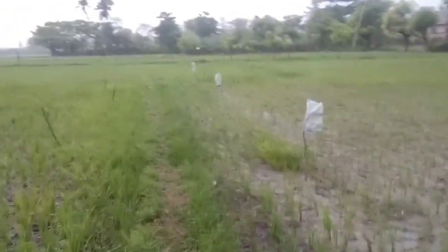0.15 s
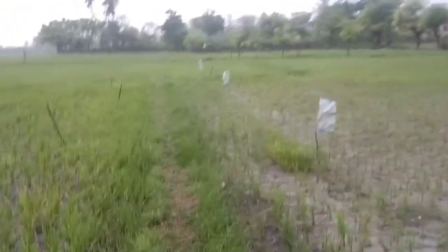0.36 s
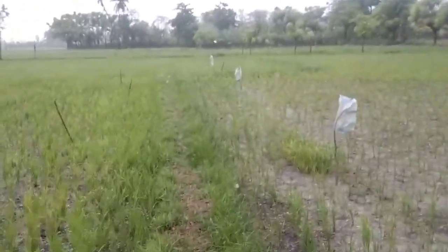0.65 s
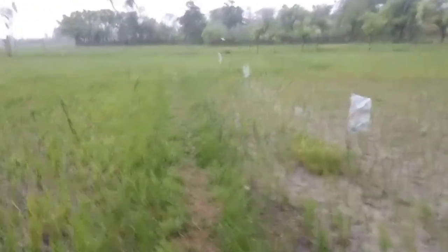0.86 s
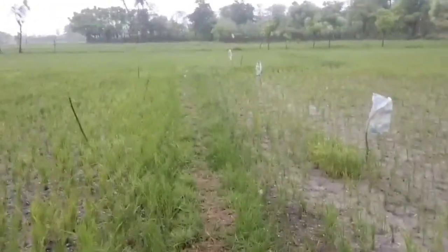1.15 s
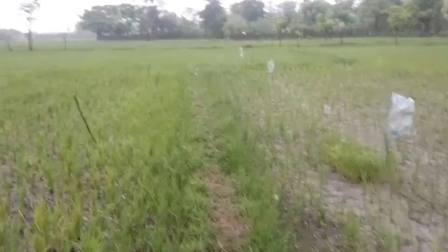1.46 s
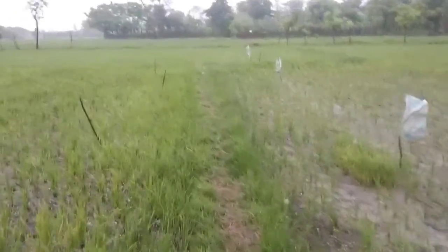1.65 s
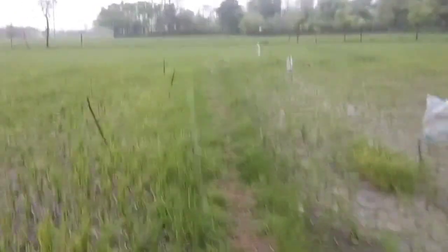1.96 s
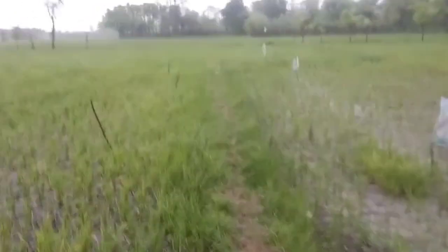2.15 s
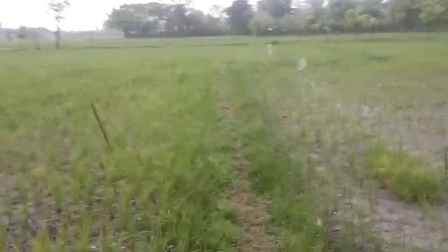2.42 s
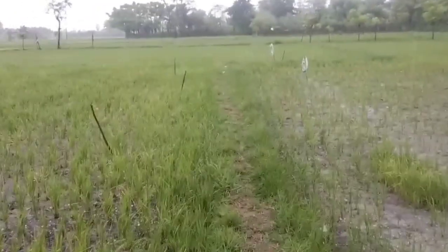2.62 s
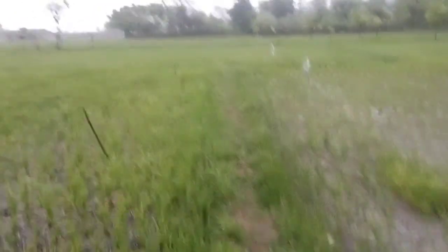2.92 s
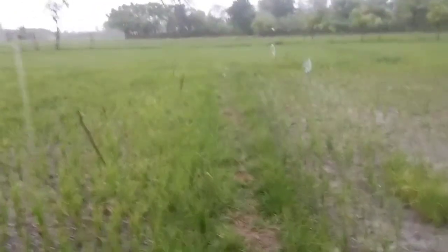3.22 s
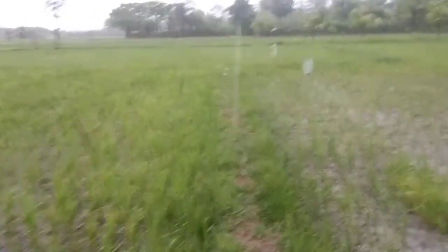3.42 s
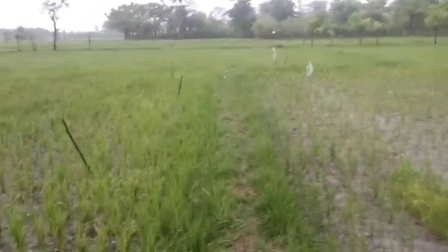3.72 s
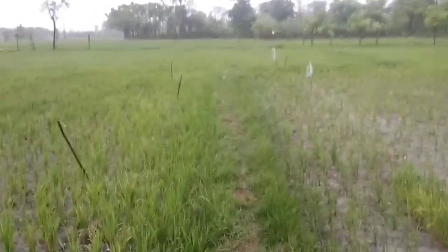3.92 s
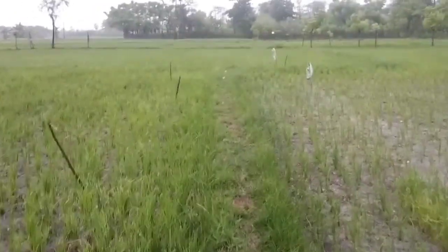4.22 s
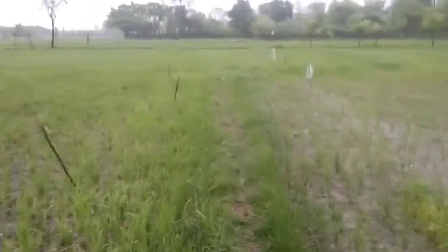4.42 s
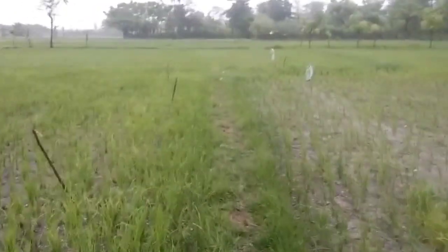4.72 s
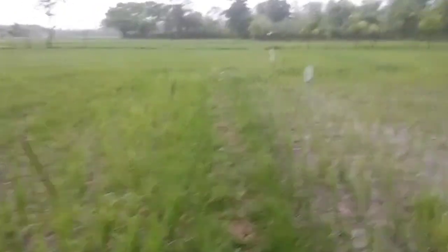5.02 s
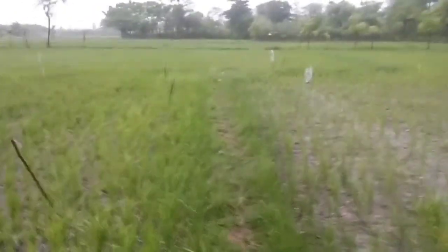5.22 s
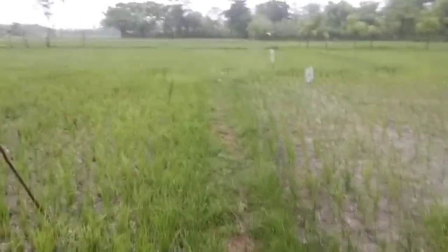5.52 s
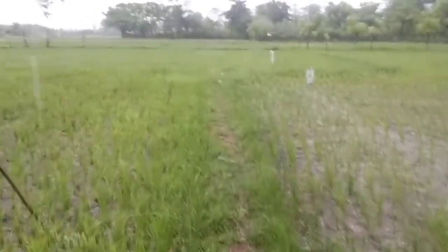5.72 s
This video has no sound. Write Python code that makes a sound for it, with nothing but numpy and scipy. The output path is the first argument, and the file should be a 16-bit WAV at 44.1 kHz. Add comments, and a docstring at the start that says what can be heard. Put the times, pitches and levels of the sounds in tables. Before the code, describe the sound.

Heavy rain drums on taut cloth close by while wind thumps the microphone; after a second the rain sinks to gated, broken bursts of drops.

```python
"""Heavy rain drums on an umbrella just above a hand-held phone in an open field; gusts buffet its microphone.
Just after one second the rain sinks; gusts and the strongest parts of drops still break through briefly.
Drops are filtered impulses and grit with short rings, small rain is random slaps over noise, wind is
lumpy low noise with thumps. A noise suppressor gates each narrow band by its margin over a usual level."""
import sys
import numpy as np
from scipy import signal
from scipy.io import wavfile
from scipy.ndimage import uniform_filter1d

SR = 44100
rng = np.random.default_rng(int(sys.argv[2]) if len(sys.argv) > 2 else 0)


def output_pcm(signal):
    """Save a mono or channel-first signal as 16-bit PCM at the path in sys.argv[1].

    Samples are clipped to [-1, 1] before scaling.
    """
    pcm = np.clip(np.atleast_2d(signal).T, -1, 1) * 32767
    wavfile.write(sys.argv[1], SR, np.round(pcm).astype(np.int16))


def field_ratio(decibels):
    """Amplitude ratio for a level in dB (20 dB per decade); scalars and array-likes work."""
    return 10 ** (np.asarray(decibels, dtype=float) / 20)


N = 258867


def evened(x):
    """Scales to rms 1."""
    return x / np.sqrt(np.mean(x ** 2) + 1e-20)


def read(points, hz):
    """Reads a spectrum on a log-frequency axis."""
    f, value = np.transpose(points)
    return np.interp(np.log(hz + 1), np.log(f + 1), value)


def add(mix, s, sound):
    """Mixes a sound in at time s."""
    part = mix[round(s * SR):][:len(sound)]
    part += sound[:len(part)]


def colour(x, points):
    """Causal minimum-phase filter of energy 1 shaped by (frequency [Hz], relative gain [dB])."""
    hz = abs(np.fft.fftfreq(8192, 1 / SR))
    log_gain = np.log(field_ratio(np.maximum(read(points, hz), -100)))
    taps = np.fft.ifft(np.exp(np.conj(signal.hilbert(log_gain)))).real[:4096]
    return signal.oaconvolve(x, taps / np.linalg.norm(taps))[:N]


def ring(hz, rise_s, fall_s):
    """A sine that swells and dies exponentially, envelope peak 1."""
    t = np.arange(3000) / SR
    envelope = (1 - np.exp(-t / rise_s)) * np.exp(-t / fall_s)
    return np.sin(2 * np.pi * hz * t) * envelope / envelope.max()


def slap(grit, splash_db=-18, splash_s=0.0021, thin_hz=120, soft_hz=9000):
    """A drop on cloth: a sharp push and a short noise splash, with little deep bass or top treble."""
    t = np.arange(len(grit)) / SR
    push = t == 0
    splash = field_ratio(splash_db) * grit * np.exp(-t / splash_s)
    return signal.lfilter(*signal.butter(1, (thin_hz, soft_hz), "band", fs=SR), push + splash)


def panel(hz):
    """One panel of cloth ringing briefly; low rings last longer."""
    time_s = .0013 + 0.3 / hz  # fixed part plus 0.3 cycles
    return ring(hz, time_s, time_s)


def large_drops():
    """Each drop slaps the cloth, rings it at two pitches and throws off nine bright droplets."""
    # (time [s], slap level [dB], main ring [Hz], its level [dB], second ring [Hz], its level [dB])
    drops = [(.0707, 32.5, 1100, 4.5, 2790, -5), (.0936, 33, 1430, 10, 2600, 0),
             (.1039, 29, 1120, 7, 2620, 2), (.1163, 30, 830, -1, 2460, -5),
             (.1253, 37.5, 840, 4.5, 4870, 3), (.1626, 35, 945, -6, 2600, -9),
             (.1819, 40, 1450, 14, 2400, 13), (.2053, 33, 1420, 8, 3330, 2),
             (.2554, 39, 1220, 3.5, 2120, 5), (.3186, 36.5, 1350, 2, 2020, 7),
             (.3294, 24, 1435, 7, 2550, 5), (.4368, 32.5, 810, -8, 3730, 2),
             (.5037, 35.5, 1340, -1, 2030, 10), (.5399, 37, 950, -3, 1990, 8),
             (.558, 12, 1300, -2.5, 2650, 2), (.5771, 16, 1300, -1, 2760, 1),
             (.6226, 28.5, 1436, 4, 3250, -3), (.6615, 31, 1070, -12, 2210, 4),
             (.6834, 33, 724, 5, 2070, 1), (.7014, 35, 14000, 19, 1340, 2),
             (.7076, 36.5, 1420, -7, 2160, 1), (.7173, 38.5, 1330, 4, 3000, -4),
             (.7457, 35, 610, -7, 2800, 2), (.7543, 35.5, 1300, 5.5, 2860, 6),
             (.781, 29.5, 1400, -12, 3260, 0), (.8296, 30.5, 1310, -1, 2110, 1),
             (.87, 33, 543, -1, 2850, 4), (.8836, 29.5, 673, 4.5, 2230, -2), (1.0109, 39, 1390, 7, 6350, 6),
             (1.0494, 33, 950, -8, 2580, 7), (1.0681, 32.5, 920, -3, 2820, 5),
             (1.1099, 36.5, 1064, 10, 3320, 4), (1.188, 32.5, 654, 5.5, 1230, -3),
             (1.239, 19, 1254, -0.5, 3570, 5), (1.275, 25, 2400, 5, 1150, -2),
             (1.288, 34, 6110, -2, 2265, 3.5), (1.304, 31.5, 1210, 5, 1970, 5),
             (1.352, 34.5, 1250, -8, 5830, 4), (1.458, 33.5, 1385, -3.5, 460, -6.5),
             (1.5035, 34.5, 1210, 4.5, 443, 2), (1.563, 36.5, 885, 3, 6550, 2.5),
             (1.609, 18, 2640, 5, 600, 2), (1.632, 28.5, 1402, 5, 3580, 7.5), (1.69, 18, 2560, 8, 1380, 2),
             (1.724, 26, 463, -5.5, 2423, 0), (1.76, 25, 1296, 3, 2020, 4.5),
             (1.835, 35.5, 508, 1, 967, 3.5), (1.8847, 34, 824, 4, 1240, -10),
             (1.969, 34.5, 1380, -0.5, 2770, -3), (2.157, 32.5, 1320, 2, 1800, -11),
             (2.208, 18, 6730, 7, 12800, 6), (2.227, 37, 359, 6, 2070, -1.5), (2.272, 21, 3750, 6, 1386, 3),
             (2.327, 31, 689, 4.5, 3480, 9), (2.347, 38, 680, 8, 2470, 5), (2.384, 41, 1626, 10, 950, 2.5),
             (2.471, 28.5, 3385, 6.5, 13400, 6), (2.549, 37, 715, 8.5, 1420, 2),
             (2.562, 37, 496, 4, 2670, 10.5), (2.6375, 39, 837, 7, 1410, 9),
             (2.687, 32.5, 3570, -13, 1435, 5.5), (2.8175, 35, 1220, 2.5, 3500, -4),
             (2.831, 35, 510, 4, 940, 1), (2.888, 34.5, 4600, 4, 2607, -4.5),
             (2.892, 35.5, 7070, 12.5, 1140, 6.5), (3.073, 30.5, 890, 2, 3750, 3),
             (3.154, 33.5, 1347, 0.5, 472, 1.5), (3.17, 26.5, 2880, 5, 1400, -1.5),
             (3.182, 40, 1460, -5, 4540, 1), (3.215, 36, 7100, 6, 2960, 3),
             (3.259, 34, 1400, 5, 2300, -1.5), (3.311, 39.5, 392, 8, 1978, -8),
             (3.613, 31.5, 11470, 6, 7260, 3.5), (3.661, 36.5, 570, -3, 9300, 4),
             (3.771, 35, 1555, 9.5, 6914, 5.5), (3.902, 29, 1040, 5, 393, -12),
             (3.917, 35.5, 467, 1, 1760, 6), (3.922, 40, 996, 3, 2570, 2), (3.992, 31, 242, 2, 1000, -11),
             (4.021, 27.5, 1340, 3.5, 13600, 4), (4.033, 22, 248, -3.5, 336, -10),
             (4.09, 34, 230, -1.5, 410, -22), (4.128, 33, 1159, 8.5, 7750, 4.5),
             (4.149, 36, 450, -2, 3360, 4), (4.194, 32.5, 3570, 8.5, 470, -0.5),
             (4.247, 23, 2200, 5, 910, -1), (4.327, 34.5, 2520, 4.5, 830, -4.5),
             (4.438, 26, 340, 2, 7230, 6), (4.443, 31, 6956, 9.5, 6050, 4),
             (4.459, 16, 343, 3.5, 250, -4.5), (4.478, 35, 344, 7.5, 2616, 6.5),
             (4.516, 28, 12500, 6.5, 300, -5.5), (4.652, 35.5, 530, 3, 1153, 9.5),
             (4.662, 30, 1950, 6, 2760, 7.5), (4.838, 23, 14100, 6.5, 15200, 4),
             (4.951, 37.5, 437, 2, 3450, 8), (4.955, 20, 147, -5.5, 5150, 6),
             (4.963, 27, 1400, 0, 830, 0.5), (5.037, 23, 443, 2, 150, -6.5),
             (5.291, 29, 2586, 5, 11280, 3.5), (5.369, 34, 3617, 4, 2310, 7.5),
             (5.447, 33.5, 3673, 2, 1300, -5), (5.468, 29.5, 11550, 12.5, 6200, 8.5),
             (5.4697, 34, 7100, 13.5, 10570, 10), (5.752, 29, 1330, 2.5, 904, 0),
             (5.85, 28, 1030, 5, 1530, -15)]
    spatter_db, spatter_hz, spatter_span_s = -40, (2200, 15210), 0.007  # level relative to the slap setting
    out = np.zeros(N)
    grits = rng.standard_normal((len(drops), 600))
    for (s, slap_db, main_hz, main_db, second_hz, second_db), grit in zip(drops, grits):
        add(out, s, field_ratio(slap_db) * slap(grit, splash_db=-33.5, thin_hz=180, soft_hz=7130))
        rings = field_ratio(main_db) * panel(main_hz) + field_ratio(second_db) * panel(second_hz)
        add(out, s - .0025, rings)  # the swell starts ahead of the slap
        for pitch, late in rng.random((9, 2)):
            droplet_hz = np.exp(np.interp(pitch, (0, 1), np.log(spatter_hz)))
            droplet = field_ratio(slap_db + spatter_db) * ring(droplet_hz, 0.00089, 0.0025)
            add(out, s + spatter_span_s * late, droplet)
    return out


def middling_drops():
    """Drops that slap the cloth without ringing it."""
    # (time [s], slap level [dB])
    slaps = [(0.1963, 21), (0.286, 35.5), (0.299, 27), (0.3073, 18), (0.334, 35), (0.348, 15), (0.3601, 24),
             (0.4652, 29), (0.487, 29), (.668, 37), (0.7264, 16), (0.7718, 33), (0.8003, 34), (0.925, 17),
             (0.9568, 30.5), (1.205, 23.5), (1.222, 25), (1.262, 29), (1.33, 28.5), (1.398, 26.5),
             (1.425, 27.5), (1.531, 23), (1.584, 21), (1.656, 27.5), (1.79, 25.5), (0.9652, 35),
             (0.9861, 27.5), (1.0205, 24), (1.0446, 28), (1.093, 6), (1.1177, 23), (1.15, 31.5),
             (1.3143, 30), (1.368, 32.5), (1.384, 27), (1.464, 27), (1.481, 26.5), (1.8552, 16), (1.87, 19),
             (1.919, 33), (1.949, 29), (1.994, 31.5), (2.033, 30.5), (2.193, 14), (2.365, 29),
             (2.376, 33.5), (2.4083, 30), (2.4146, 36), (2.4355, 28), (2.4642, 36), (2.5713, 37),
             (2.5942, 24), (2.6223, 21), (2.6424, 33.5), (2.657, 24), (2.667, 21), (2.719, 25),
             (2.6903, 33.5), (2.848, 25), (3.1998, 31.5), (3.2096, 34.5), (3.249, 30), (3.273, 35),
             (3.333, 24), (3.3454, 32.5), (3.387, 27), (3.425, 31), (3.4465, 30), (3.4854, 27),
             (3.5538, 31), (3.9474, 26), (3.964, 36), (4.084, 28), (4.288, 33.5), (4.376, 29.5),
             (4.674, 25), (4.6962, 24), (4.7267, 22), (4.796, 28), (4.838, 18), (4.985, 28), (5.497, 32),
             (5.535, 31.5), (5.607, 26), (5.692, 33)]
    out = np.zeros(N)
    for (s, slap_db), grit in zip(slaps, rng.standard_normal((len(slaps), 600))):
        add(out, s, field_ratio(slap_db) * slap(grit, splash_db=-24.0, soft_hz=5850))
    return out


def patter(drops_per_s=380, spread_db=4, wash_db=-3.5):
    """Small drops at random, drawn from ten slaps, over the noise wash of rain on the field."""
    hit = rng.random(N) < drops_per_s / SR
    size = field_ratio(spread_db * np.minimum(rng.exponential(1, N), 2.4)) * hit
    spot = rng.integers(0, 10, N)
    out = np.zeros(N)
    for k, grit in enumerate(rng.standard_normal((10, 600))):
        out += signal.oaconvolve(size * (spot == k), slap(grit))[:N]
    wash = field_ratio(wash_db) * rng.standard_normal(N)  # level relative to the drops
    return evened(evened(out) + wash)


def ticks(ticks_per_s=160, loudest_db=-6, spread_db=7, range_hz=(3000, 15350)):
    """Small drops that ring only the treble, at random moments and pitches."""
    out = np.zeros(N)
    for at, pitch, size in rng.random((int(ticks_per_s * N / SR), 3)):
        tick_hz = np.interp(pitch, (0, 1), range_hz)
        add(out, at * N / SR, field_ratio(loudest_db - spread_db * size) * ring(tick_hz, 0.0039, 0.0026))
    return out


def wind(lump_db=4, lump_s=0.011, thump_cycles=0.54):
    """Low turbulence on the microphone port: noise in lumps, plus hard thumps as Gaussian sine bursts."""
    # wind level: (time [s], level [dB])
    gusts = [(0, -36), (0.38, -49), (.42, -35.5), (1.101, -32.5), (1.14, -33), (1.2, -25.5), (1.3, -31),
             (1.4, -36.5), (1.55, -34.5), (1.62, -45), (1.75, -38.5), (1.9, -82), (2.07, -74), (2.11, -74),
             (2.5, -76), (2.551, -37.5), (2.6, -30.5), (2.691, -27.5), (2.75, -19.5), (2.809, -32),
             (2.95, -36.5), (2.99, -28), (3.1, -29.5), (3.2, -31), (3.302, -37.5), (3.5, -47.5), (3.7, -56),
             (4.1, -60), (4.4, -60), (4.55, -54), (4.75, -54), (4.95, -41.5), (5.08, -53), (5.24, -50),
             (5.28, -46), (5.331, -32), (5.382, -37), (5.5, -20.5), (5.64, -32.5), (5.8, -35),
             (5.87, -41.5)]
    # turbulence spectrum: (frequency [Hz], relative gain [dB])
    buffet = [(20, -88), (40, -45), (62, -11), (95, 3.5), (160, -4), (230, -9), (374, -11.5), (540, -19.5),
              (900, -60)]
    # single pressure thumps: (centre [s], envelope peak [dB], frequency [Hz])
    thumps = [(0.065, -19.5, 148), (0.409, -17, 127), (0.437, -14.5, 158), (0.481, -16, 115),
              (0.524, -17, 142), (0.603, -22, 137), (0.698, -18.5, 176), (0.735, -16, 190),
              (0.773, -18, 180), (0.7982, -14.5, 180), (0.83, -19, 148), (0.904, -15, 155),
              (1.021, -21, 154), (1.06, -27, 159), (1.135, -7.5, 155), (1.153, -22, 146), (1.208, -20, 178),
              (1.654, -22.5, 118), (2.114, -26.5, 82), (2.559, -20.5, 142), (2.58, -21.5, 127),
              (2.7115, -17, 176), (2.7331, -7.5, 254), (2.747, -10.5, 164), (2.7611, -10, 190),
              (2.79, -28, 159), (2.981, -19.5, 129), (2.996, -14.5, 156), (3.015, -16.5, 139),
              (3.034, -18, 134), (3.093, -15.5, 148), (3.125, -24.5, 120), (3.145, -22.5, 121),
              (3.173, -18.5, 190), (3.181, -16.5, 190), (3.206, -15, 203), (3.212, -20.5, 203),
              (5.284, -27.5, 137), (5.37, -16.5, 137), (5.3833, -14, 182), (5.406, -15.5, 165),
              (5.436, -22.5, 156), (5.453, -13, 166), (5.4837, -21, 163), (5.5, -9, 220),
              (5.5343, -11.5, 190), (5.559, -44, 154), (5.578, -18, 173), (5.595, -15, 150),
              (5.627, -16.5, 183), (5.7116, -16.5, 145), (5.803, -23.5, 133.6)]
    gust_s, gust_db = np.transpose(gusts)
    smooth = uniform_filter1d(rng.standard_normal(N), int(lump_s * SR))
    lumps = evened(uniform_filter1d(smooth, 300))
    out = evened(colour(field_ratio(lump_db * lumps) * rng.standard_normal(N), buffet))
    out = out * field_ratio(np.interp(np.arange(N) / SR, gust_s, gust_db))
    t = np.arange(-.03, .03, 1 / SR)
    for s, peak_db, hz in thumps:
        envelope = field_ratio(peak_db) * np.exp(-(hz * t / thump_cycles) ** 2)
        phase = rng.uniform(0, 2 * np.pi)
        add(out, s + t[0], envelope * np.sin(2 * np.pi * hz * t + phase))
    return out


def scene():
    """Large and middling drops over small rain that swells with the shower, all coloured by cloth; wind."""
    # how hard the small rain falls: (time [s], level [dB])
    shower = [(0, 3), (.05, 2.5), (.15, 1.5), (.23, 1), (.3, 2.5), (.42, 2), (.52, 5), (.62, 3), (.72, 3.5),
              (.94, 1), (1.1, 3), (1.25, 2.5), (1.449, 3.5), (1.75, 4), (1.92, 1), (2.1, 1), (2.22, 4),
              (2.3, 3), (2.36, 2.5), (2.403, 5), (2.525, 0.5), (2.56, 7), (2.75, 4), (2.95, 1),
              (3.117, 4.5), (3.17, 6), (3.26, 4.5), (3.35, 2.5), (3.501, 1), (4.3, 1), (5.87, 1)]
    # drops on cloth as the microphone hears them: (frequency [Hz], relative gain [dB])
    cloth = [(30, -13), (50, 2), (100, -5), (200, -4), (400, 1), (800, -0.5), (1080, -2), (1350, -1),
             (1650, -7), (2000, -9), (3200, -14), (5000, -22.5), (7000, -20.5), (10000, -30), (13000, -25),
             (15300, -17.5), (15800, -57)]
    rain_db = -34
    shower_s, shower_db = np.transpose(shower)
    small_rain = field_ratio(np.interp(np.arange(N) / SR, shower_s, shower_db)) * (patter() + ticks())
    rain = small_rain + large_drops() + middling_drops()
    return (field_ratio(rain_db) * colour(rain, cloth) + wind())[None]


def suppress(x, depth_db=28, knee_db=7, close_db_per_s=230):
    """Noise suppressor: a band opens fast above its usual level plus a margin, and closes slowly."""
    # margin reduction, largest in the bass: (frequency [Hz], reduction [dB])
    wind_ease = [(60, 4), (150, 6.5), (300, 1.45)]
    fresh_db, learnt_db = (0.5, 6.5), (8, 10)  # margins of (low, high) bands before and after learning
    learn_s, learn_span_s = 1.158, 0.037
    creep_db, creep_s = 4.5, 1.37  # further growth of the margin once learnt
    hz, t, z = signal.stft(x, SR, nperseg=768, noverlap=640)
    power_db = 10 * np.log10(abs(uniform_filter1d(abs(z) ** 2, size=3, axis=0)) + 1e-14)
    usual_db = uniform_filter1d(np.percentile(power_db, 23, axis=1), size=7)  # over the whole scene

    learnt = 1 / (1 + np.exp(np.clip((learn_s - t) / learn_span_s, -50, 50)))
    grown_db = creep_db * (1 - np.exp(-np.maximum(t - learn_s, 0) / creep_s))
    low_db, high_db = np.outer(fresh_db, 1 - learnt) + np.outer(learnt_db, learnt) + grown_db
    high = np.clip(np.log(hz + 1) / np.log(2) / 2.515 - 4.4, 0, 1)[:, None]  # 0 under 2.1 kHz, 1 over 12 kHz
    margin_db = (1 - high) * low_db + high * high_db - read(wind_ease, hz)[:, None]

    excess_db = power_db - usual_db[:, None] - margin_db
    gain_db = depth_db * (np.clip(excess_db / knee_db, 0, 1) - 1)
    fall_db = close_db_per_s * t
    held_db = np.maximum.accumulate(gain_db + fall_db, axis=1) - fall_db
    gain = field_ratio(uniform_filter1d(held_db, size=4, axis=1))
    return signal.istft(z * gain, SR, nperseg=768, noverlap=640)[1][:N]


def band_limit(x):
    """A steep low-pass at the top of the band."""
    return signal.sosfilt(signal.butter(12, 16510, fs=SR, output="sos"), x)


def record(dry):
    """The microphone cuts the deep bass, then the noise suppressor acts."""
    cut = signal.lfilter(*signal.butter(2, 70, "high", fs=SR), dry[0])
    mix = suppress(cut)[None]
    return band_limit(mix)


dry = scene()
out = record(dry)
output_pcm(out)
```